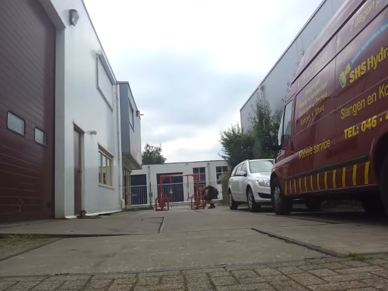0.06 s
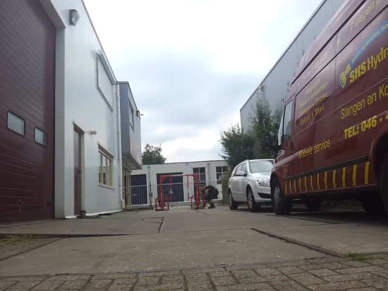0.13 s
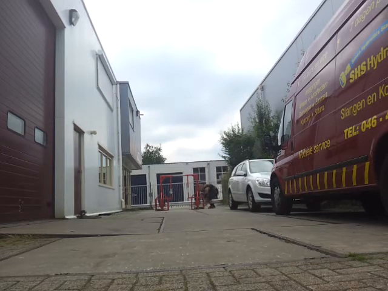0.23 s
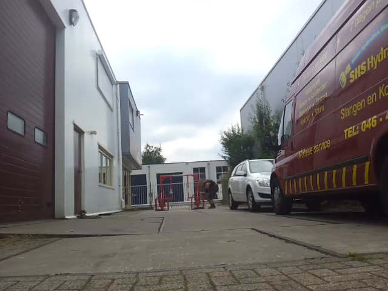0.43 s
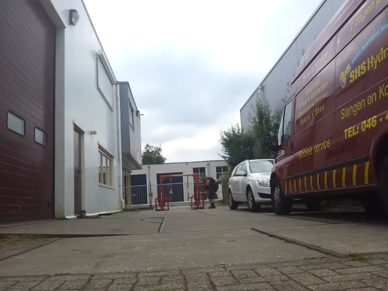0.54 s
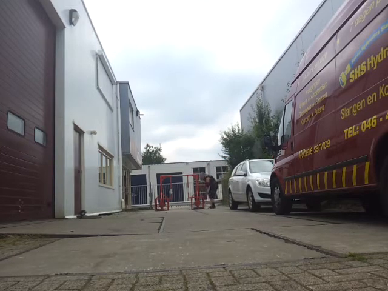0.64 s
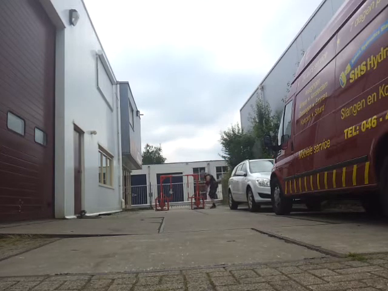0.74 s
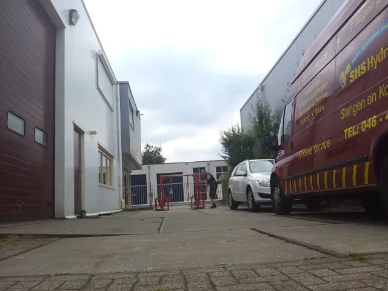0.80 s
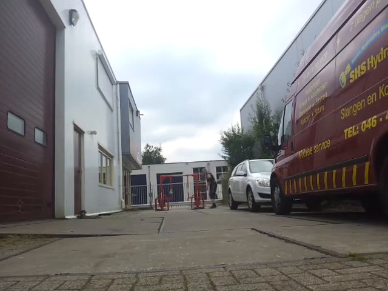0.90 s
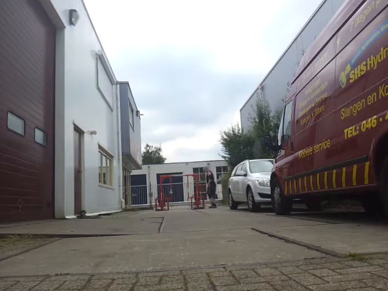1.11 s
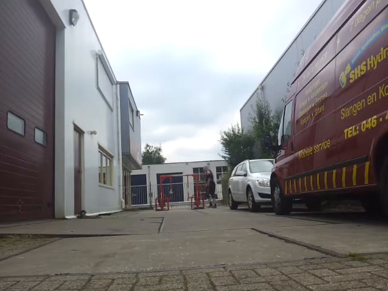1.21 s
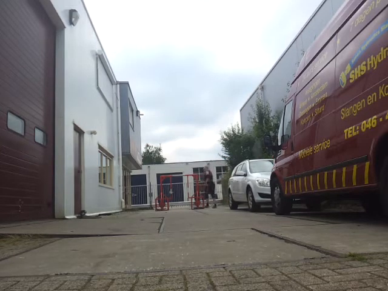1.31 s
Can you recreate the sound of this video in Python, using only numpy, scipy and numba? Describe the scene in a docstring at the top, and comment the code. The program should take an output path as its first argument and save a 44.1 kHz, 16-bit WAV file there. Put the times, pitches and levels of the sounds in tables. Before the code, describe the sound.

A heavy steel frame crashes onto paving and rings, echoing around a yard.

```python
"""Steel frame dropped in a yard

Some way off from the microphone, one corner thuds on the paving, then the whole heavy frame crashes
and its tubes ring. Ribbed building fronts throw back pitched slaps, and the yard reverberates.
Behind it are light scuffs, a far engine slowing, a faint chirp and town rumble.
The recorder's limiter holds the crash down."""
import sys
import numpy as np
from scipy import signal
from scipy.fft import rfft, irfft
from scipy.io import wavfile
from scipy.ndimage import uniform_filter1d
from numba import njit

SR = 44100
rng = np.random.default_rng(int(sys.argv[2]) if len(sys.argv) > 2 else 0)


def file_out(sig):
    """Save sig as 16-bit WAV at sys.argv[1]."""
    # one column per channel
    cols = np.atleast_2d(sig).T
    # limit, then scale
    lim = np.clip(cols, -1, 1)
    pcm = np.round(lim * 32767).astype(np.int16)
    wavfile.write(sys.argv[1], SR, pcm)


N = 59535
T = np.arange(N) / SR
FREQS = np.maximum(np.arange(N // 2 + 1) * SR / N, 1)


def undb(db):
    return 10 ** (np.asarray(db) / 20)


def fade(t, t60):
    """Exponential decay that starts at t = 0."""
    return (t >= 0) * np.exp(-np.log(1000) * np.maximum(t, 0) / t60)


def ramp(t, rise_s):
    return np.clip(t / rise_s, 0, 1)


def noise(spectrum, tilt_db=0):
    """Noise of rms 1 shaped by (Hz, dB) points, tilted per octave around 1 kHz."""
    hz, db = np.array(spectrum)[:, :2].T
    tilt = tilt_db * np.log2(np.maximum(FREQS, 200) / 1000)
    gain = undb(np.interp(np.log(FREQS), np.log(hz), db) + tilt)
    x = irfft(gain * np.exp(2j * np.pi * rng.random(len(FREQS))), N)
    return x / x.std()


def drift(rate_hz):
    """Smooth random drift with a spread of 1."""
    hold = max(int(SR / rate_hz), 1)
    steps = np.repeat(rng.standard_normal(N // hold + 1), hold)
    x = uniform_filter1d(steps, hold)[:N]
    return x / x.std()


def tone(hz):
    """Sine of rms 1 on a moving pitch."""
    return np.sqrt(2) * np.sin(2 * np.pi * (np.cumsum(hz) / SR + rng.random()))


# The frame landing, some way off (time [s], level [dB], treble tilt [dB/octave])
FRAME_BLOWS = [(0.2079, -21.5, -3.5), (0.2169, 4.5, 0.5), (0.2263, -3, 2), (.2440, -5, 2.5),
               (0.251, -5, -1)]
# Steel on stone (frequency [Hz], level [dB])
CRACK_SPECTRUM = [(60, -44), (250, 0.5), (700, 0), (2000, 2), (3200, 1), (4500, -15), (7000, -7.5),
                  (11000, -27), (13000, -13)]

def crash(crack_db=-4.5, clang_db=-10.5):
    """Each blow cracks on the paving and sets the frame clanging."""
    out = np.zeros(N)
    for start, db, tilt_db in FRAME_BLOWS:
        t = T - start
        crack = noise(CRACK_SPECTRUM, tilt_db) * fade(t, t60=0.074)
        out += undb(db) * (undb(crack_db) * crack + undb(clang_db) * clang(t, tilt_db))
    return out


# Frame clatter with the yard's reverberation on it (frequency [Hz], level [dB], t60 [s])
CLANG_BANDS = [(60, -32.5, 0.98), (302, -6, 1), (380, -14.5, 0.89), (481, -5, 1), (700, -4.5, 0.93),
               (1170, -1, 0.63), (1720, 0, 0.68), (2470, -1, 0.51), (4130, -8, 0.49), (6550, -1, 0.45),
               (7450, -0.5, 0.41), (8360, -10, 0.48), (10000, -7.5, 0.31), (11470, -8, 0.13),
               (13000, -23, 0.12), (16000, -24, .12)]

def clang(t, tilt_db, build_s=0.0041):
    """Dense ringing of the steel builds up quickly; each band dies at its own rate."""
    hz, _, t60s = np.array(CLANG_BANDS).T
    spectrum = rfft(noise(CLANG_BANDS, tilt_db))
    out = np.zeros(N)
    for one_band, t60 in zip(np.eye(len(hz)), t60s):
        band_gain = np.interp(np.log(FREQS), np.log(hz), one_band)
        out += irfft(spectrum * band_gain, N) * fade(t, t60)
    return out * (1 - np.exp(-np.maximum(t, 0) / build_s))


# Clear notes of the steel tubes (frequency [Hz], level [dB], t60 [s])
TUBE_MODES = [(472, -9, 1.05), (546, -5, .65), (581, -5, .6), (635, -4, .85), (697, -1, .95), (902, 0, .8),
              (953, -7, 1.0), (1145, -3, .6), (1284, -2, .6), (1596, -2, .55), (1686, 5, .55),
              (1891, -4, .55), (1969, -3, .72), (2333, 1, .45), (2538, -3, .55), (2697, -5, .52),
              (3355, -2, .46), (3833, -4, .42), (4958, -8, .42), (5857, -5, .44), (6372, -2, .37),
              (7605, 3, .23), (9674, -9, .3)]

def tube_ring(t, level_db=-19):
    """The struck tubes ring in their modes, each wavering in level and pitch."""
    out = np.zeros(N)
    for hz, db, t60 in TUBE_MODES:
        shimmer = undb(3.55 * drift(35.15))
        out += undb(level_db + db) * tone(hz + 4 * drift(40.13)) * shimmer * fade(t, t60)
    return out


# First corner down, then the low boom of the frame (time [s], level [dB], t60 [s])
GROUND_THUDS = [(0.2051, -18.5, 0.038), (.219, -22, 0.14), (0.4, -25, 0.11)]
# Their dull body (frequency [Hz], level [dB])
THUD_SPECTRUM = [(80, -33), (200, -16), (300, 2.5), (420, -4.5), (600, 2), (900, -11), (1500, -41),
                 (4000, -63)]

def thuds(attack_s=0.002):
    """The weight of the frame meets the ground."""
    envelope = sum(undb(db) * fade(T - start, t60) * ramp(T - start, attack_s)
                   for start, db, t60 in GROUND_THUDS)
    return envelope * noise(THUD_SPECTRUM)


# Echoes off the ribbed fronts, as they reach the microphone
# (time [s], length [s], low note [dB], high note [dB], splash [dB])
FRONT_ECHOES = [(0.3074, 0.012, -11.5, -29, -20.5), (0.3428, 0.013, -11.5, -11, -16.5),
                (0.365, 0.0058, -13.5, -10.5, -20.5), (0.3734, 0.0051, -22, -19, -25.5),
                (0.3917, 0.0046, -35, -13, -31), (0.403, 0.0027, -13, -30, -32.5),
                (0.4827, 0.016, -18.5, -13.5, -18), (0.6084, 0.014, -28, -43, -37.5),
                (0.666, 0.0067, -35.5, -47, -43.5), (0.685, 0.0051, -51, -39, -44),
                (0.831, 0.007, -46, -64, -48.5)]
# Broad splash of an echo (frequency [Hz], level [dB])
SPLASH_SPECTRUM = [(100, -27), (300, -18), (550, 4.5), (900, -3), (1400, 1.5), (2200, -1), (3000, -4.5),
                   (4300, -14.5), (7200, -10.5), (9000, -23.5), (12000, -59)]

def rib_slaps(low_hz=930, high_hz=1955, wobble=0.0254, attack_s=0.0027, release_s=0.0037):
    """Evenly spaced ribs draw each echo out into a short two-note burst, with a splash and a tail."""
    out = np.zeros(N)
    for start, length, low_db, high_db, splash_db in FRONT_ECHOES:
        t = T - start
        onset = ramp(t, attack_s)
        burst = onset * np.exp(-np.maximum(t - length + release_s, 0) / release_s)
        for hz, db in (low_hz, low_db), (high_hz, high_db):
            out += undb(db) * burst * tone(hz * (1 + wobble * drift(700)))
        splash = fade(t, t60=0.17)
        tail = undb(-14) * fade(t, t60=0.73)
        out += undb(splash_db) * noise(SPLASH_SPECTRUM) * onset * (splash + tail)
    return out


# Late sound between the buildings (frequency [Hz], level [dB])
YARD_SPECTRUM = [(100, 0), (400, -4), (680, 2), (1000, 8.5), (1300, 1), (2000, 0), (3000, -6),
                 (4300, -13.5), (7000, -21.5), (10000, -51)]

def yard_reverb(t, level_db=-21.5):
    """Reflections of the crash fill the yard and die away."""
    envelope = ramp(t, rise_s=0.34) * fade(t, t60=1.205)
    return undb(level_db + drift(40.6)) * noise(YARD_SPECTRUM) * envelope


# Light scuffs, faint at the microphone (time [s], length [s], level [dB])
PAVING_SCUFFS = [(0.091, 0.069, -44.5), (1.051, .018, -51)]
# Their grit (frequency [Hz], level [dB])
SCUFF_SPECTRUM = [(200, -8), (900, 4), (1800, -12), (4500, -16), (6500, 0), (8000, -7), (11500, -15),
                  (13000, -31)]

def scuffs():
    """Soft gritty swells on the paving, before and after the crash."""
    swell = sum(undb(db) * np.sin(np.pi * ramp(T - start, length))
                for start, length, db in PAVING_SCUFFS)
    return swell * noise(SCUFF_SPECTRUM) * undb(2.2 * drift(220))


# Engine far from the yard (time [s], second harmonic [Hz], level [dB])
ENGINE_TRACK = [(0, 123.5, -46), (0.551, 128, -50), (0.722, 119.2, -42), (0.819, 110.5, -44),
                (0.951, 109, -46), (1.1, 99, -47), (1.35, 92, -55.5)]
# Its harmonics (frequency over the second harmonic [ratio], level [dB])
ENGINE_HARMONICS = [(.5, -8), (1, 0), (1.5, -7), (2, -11)]

def far_engine():
    """An engine's hum sinks unsteadily as it slows."""
    times, hz, db = np.array(ENGINE_TRACK).T
    pitch = np.interp(T, times, hz) * (1 + 0.013 * drift(25.34))
    hum = sum(undb(level + drift(33)) * tone(ratio * pitch) for ratio, level in ENGINE_HARMONICS)
    return undb(np.interp(T, times, db)) * hum


# Faint chirp in the background (time [s], pitch [Hz], level [dB])
CHIRP_TRACK = [(1.17, 4200, -92), (1.21, 4280, -68), (1.26, 4170, -67), (1.298, 3954, -67),
               (1.35, 4000, -72)]

def chirp(octave_db=2):
    """A thin, fluttering note with its octave."""
    times, hz, db = np.array(CHIRP_TRACK).T
    pitch = np.interp(T, times, hz) * (1 + 0.0148 * drift(600))
    return undb(np.interp(T, times, db)) * (tone(pitch) + undb(octave_db) * tone(2 * pitch))


# The town beyond the yard (frequency [Hz], level [dB])
TOWN_SPECTRUM = [(20, -28), (30, -12), (42, 3.5), (75, -5), (160, -7), (250, -12.5), (400, -20),
                 (1000, -27), (2000, -31), (4000, -36), (7500, -36.5), (11500, -45.5), (12500, -49),
                 (16000, -61)]

def town_rumble(level_db=-41.5):
    """The town lays a steady low noise under everything."""
    return undb(level_db) * noise(TOWN_SPECTRUM)


def scene():
    """The yard in mono, from the ground some way off; the hardest blow starts the ring and reverb."""
    since_hardest = T - max(FRAME_BLOWS, key=lambda blow: blow[1])[0]
    drop = crash() + tube_ring(since_hardest) + yard_reverb(since_hardest) + thuds() + rib_slaps()
    return (drop + scuffs() + far_engine() + chirp() + town_rumble())[None]


@njit
def follow_peaks(x, attack_s, release_s):
    """The limiter's detector rises fast on a peak and falls back more slowly."""
    out, level = np.empty(len(x)), 0.
    for i in range(len(x)):
        size = abs(x[i])
        level += (size - level) / (SR * (attack_s if size > level else release_s))
        out[i] = level
    return out


def record(dry, limit_db=-0.5, ceiling=0.7, shelf_hz=11840, shelf_db=-17, top_hz=15900):
    """Peaks are limited and rounded; the treble is dulled above about 12 kHz and cut off near 16 kHz."""
    peak = follow_peaks(dry[0], attack_s=0.00034, release_s=0.012)
    held = dry / np.maximum(peak / undb(limit_db), 1)
    rounded = held / (1 + (held / ceiling) ** 8) ** (1 / 8)
    dull = signal.fftconvolve(rounded, signal.firwin(81, shelf_hz, fs=SR)[None], mode="same")
    shelved = dull + undb(shelf_db) * (rounded - dull)
    top_cut = signal.firwin(255, top_hz, window=("kaiser", 9), fs=SR)
    return signal.fftconvolve(shelved, top_cut[None], mode="same")


dry = scene()
out = record(dry)
file_out(out)
```